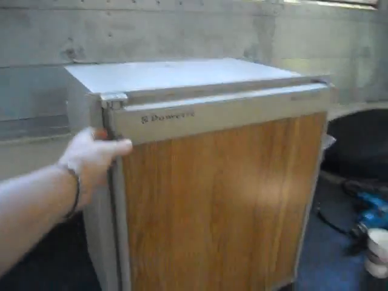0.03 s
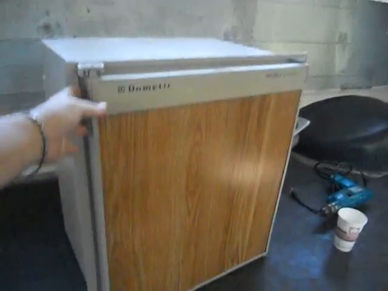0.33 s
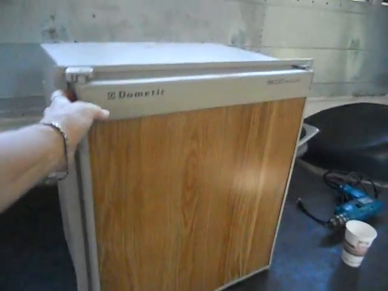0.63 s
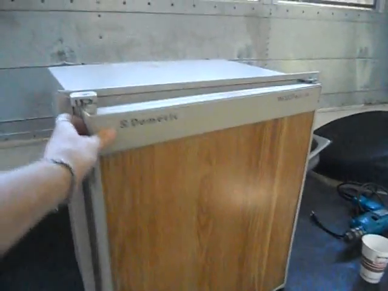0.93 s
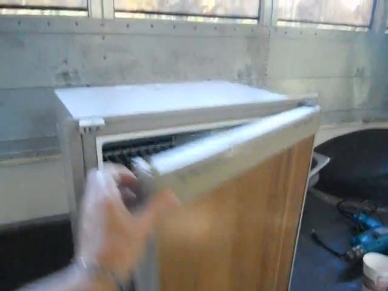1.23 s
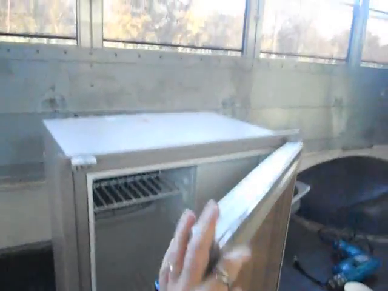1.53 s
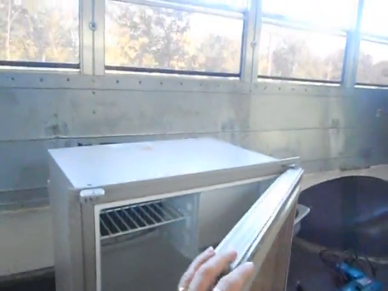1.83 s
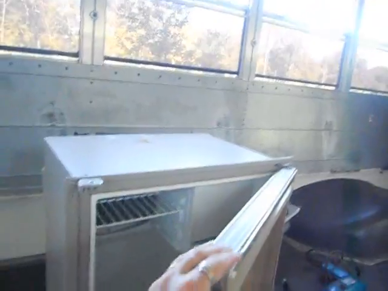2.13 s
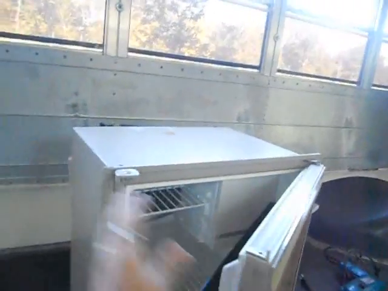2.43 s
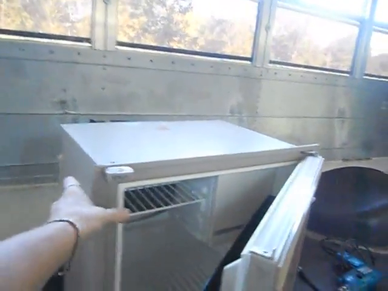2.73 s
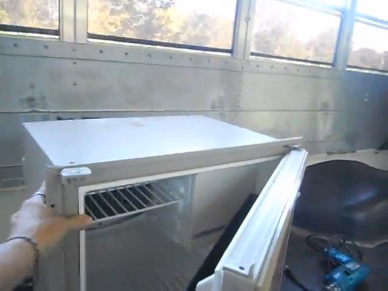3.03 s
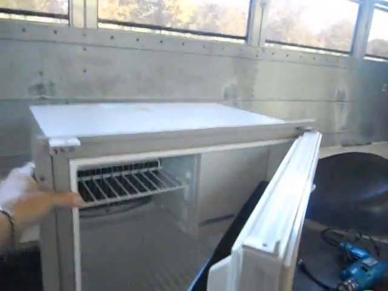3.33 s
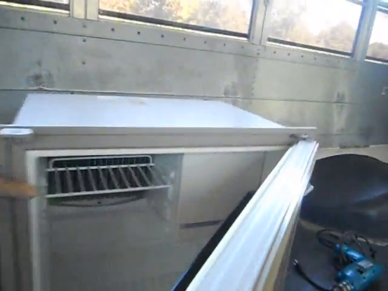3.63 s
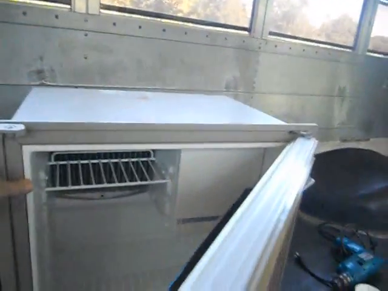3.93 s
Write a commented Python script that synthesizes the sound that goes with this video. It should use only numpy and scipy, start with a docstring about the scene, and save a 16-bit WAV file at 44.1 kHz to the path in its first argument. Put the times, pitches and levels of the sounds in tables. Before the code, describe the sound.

A bus engine idles throughout, heard inside the cabin as a deep drone with pulsing rumble, faint whines and hiss. Around 1 second a small fridge unlatches nearby with sharp clicks and knocks, and the engine level dips slightly. The door clicks and bumps at 1.6 seconds. A soft thump comes at 3.2 and a bright click at 3.5. Near 3.9 a loud, close clack ducks everything.

```python
"""Inside a bus, its six-cylinder engine idling: a deep firing drone, a pulsing rumble, faint whines, hiss.
From 0.6 s to 2 s the microphone moves to a second spot in the cabin's standing waves, and the tones
change balance. Around 1 s a hand unlatches a small fridge, then swings its door open with clicks, knocks
and soft bumps. Near 3.9 s a last loud clack close by makes the recorder's gain control duck everything."""
import sys
import numpy as np
from scipy import signal
from scipy.fft import rfft, irfft, next_fast_len
from scipy.io import wavfile
from scipy.ndimage import uniform_filter1d, map_coordinates

SR = 44100
rng = np.random.default_rng(int(sys.argv[2]) if len(sys.argv) > 2 else 0)


def transcribe(signal):
    """Save signal, clipped to [-1, 1], as a 16-bit WAV file at the path in sys.argv[1]."""
    frames = np.atleast_2d(signal).T
    limited = np.clip(frames, -1, 1)
    pcm = np.round(limited * 32767).astype(np.int16)
    wavfile.write(sys.argv[1], SR, pcm)


N = 176400

FIRING_HZ, CYLINDERS = 38.06, 6
TOP_HZ = 10020  # the recorder's band limit
# level of the background as heard, ducked by the recorder's gain control near 1.07 s and slowly
# recovering: t/s, boom level/dB, clatter level/dB, hiss level/dB
BACKGROUND_LEVELS = [(0, -24.5, -29.5, -37.5), (.7, -25, -28.5, -37.5), (1.05, -25, -29, -37.5),
                     (1.1, -28, -31, -39.5), (1.7, -27.6, -31, -39), (2.3, -26.5, -29.5, -38),
                     (2.8, -24, -28, -37), (3.3, -24, -28, -36), (3.85, -24, -26.5, -36)]


def clicks():
    """Hard contacts of latch and door crack and ring the steel fittings, the bright glancing ones least."""
    # contacts: t/s, level/dB, t60/s, tilt/dB per octave
    contacts = [(.811, -21, 0.011, -.7), (.950, -32, 0.05, 1), (1.027, -10.5, 0.009, 0.8),
                (1.056, -20.5, 0.0099, -3.5), (1.570, -18.5, 0.02, -2.5), (1.580, -25.5, .022, -2),
                (1.604, -23.5, 0.026, -1), (3.503, -19, 0.041, 5.5), (3.520, -31.5, 0.24, 4),
                (3.865, -18.5, 0.049, -2.5), (3.872, -13.5, 0.068, -2.5), (3.885, -2.5, 0.029, -3),
                (3.901, -11.5, .02, -.7)]
    # spectrum of a crack: f/Hz, level/dB
    crack_colour = [(300, -5), (1000, 6), (1600, -8), (2500, 2.5), (3500, -3), (4500, 0), (6000, 0),
                    (9500, -4)]
    # modes of the fittings: f/Hz, level/dB, t60/s
    steel_modes = [(2360, -9, .05), (2600, -7.5, .05), (3460, -10, .06), (5160, -19, .05)]
    out, t = np.zeros(N), np.arange(SR // 4) / SR
    attack = 1 - np.exp(-t / 0.00019)
    for s, db, t60, tilt_db in contacts:
        crack = amp(-60 * t / t60) * coloured(rng.standard_normal(len(t)), crack_colour, tilt_db)
        glance_db = 3 * max(tilt_db, 0)
        ring = sum(amp(level - glance_db - 60 * t / ring_s) * t60 / ring_s * np.sin(2 * np.pi * hz * t)
                   for hz, level, ring_s in steel_modes)
        add(out, s, amp(db) * (crack + ring) * attack)
    return out


def knocks():
    """Each knock rings the fridge cabinet's panels over a dull thud."""
    # blows on the cabinet: t/s, level/dB, tilt/dB per octave
    blows = [(.953, -24.5, 4.5), (1.026, -20.5, -1), (1.056, -15, 1), (1.068, -16.5, 1), (1.612, -14, 2.5),
             (1.633, -19, -1), (3.505, -20.5, -1), (3.877, -8, 1), (3.886, 1.6, -1)]
    # modes of the panels: f/Hz, level/dB, t60/s
    panel_modes = [(181.6, 0, 0.14), (303, -12, 0.069), (559, -14.5, 0.097), (717, -11.5, 0.085),
                   (869, -7, 0.064), (1029, -7, 0.045), (1174, -9, .03)]
    # spectrum of the thud: f/Hz, level/dB
    thud_colour = [(70, -16), (170, -3), (400, 3.5), (1300, -8.5), (1900, -13.5), (4000, -18), (9000, -46)]
    thud_db, thud_t60_s, pivot_hz = -3.5, 0.034, 400
    out, t = np.zeros(N), np.arange(SR // 3) / SR
    attack = 1 - np.exp(-t / .001)
    for s, db, tilt_db in blows:
        ring = np.zeros(len(t))
        for hz, level, t60 in panel_modes:
            mode_db = level + tilt_db * np.log2(hz / pivot_hz) + rng.normal(0, 1)
            mode_hz = hz * (1 + rng.normal(0, 0.015))
            ring += amp(mode_db - 60 * t / t60) * np.sin(2 * np.pi * mode_hz * t)
        noise = coloured(rng.standard_normal(len(t)), thud_colour, tilt_db)
        thud = amp(thud_db - 60 * t / thud_t60_s) * noise
        add(out, s, amp(db) * (ring + thud) * attack)
    return out


def bumps():
    """The hand pushes softly on door and cabinet: a low thump whose pitch sags as the push relaxes."""
    # pushes: t/s, level/dB
    pushes = [(1.050, -20), (1.604, -13), (3.234, -14.5)]
    start_hz, end_hz, sag_s = 239, 146, 0.014
    rise_s, t60 = 0.0053, 0.35
    out, t = np.zeros(N), np.arange(SR // 3) / SR
    hz = end_hz + (start_hz - end_hz) * np.exp(-t / sag_s)
    thump = sine(hz) * amp(-60 * t / t60) * (1 - np.exp(-t / rise_s))
    for s, db in pushes:
        add(out, s, amp(db) * thump)
    return out


def cabin_echo(x, t60=0.17):
    """The short echo of the bare bus interior, reaching the microphone 4 ms after the direct sound."""
    t = np.arange(SR // 2) / SR
    tail = rng.standard_normal(len(t)) * amp(-60 * t / t60) * (t > .004)
    return signal.fftconvolve(x, tail / np.linalg.norm(tail))[:N]


def drone():
    """The firing rate and its multiples boom in the cabin; the overtones waver more."""
    # harmonics: multiple of the firing rate, level/dB at the first spot, level/dB at the second
    harmonics = [(1, -17.5, -18), (2, -35, -34), (3, -35, -36), (4, -31.5, -40), (5, -34.5, -33.5),
                 (7, -41.5, -44.5), (8, -36.5, -41.5), (14, -45.5, -42)]
    # rise and fall of the whole drone: t/s, level/dB
    drone_gain = [(0, -0.5), (.8, 2.1), (1.04, 0), (1.1, -1), (1.7, -1.5), (2.4, 2), (3.25, 1.7), (3.85, 2)]
    phase, tones = 2 * np.pi * firings(), np.zeros(N)
    for k, first_db, second_db in harmonics:
        db = microphone_move(first_db, second_db) + 0.3062 * min(k, 6) * wobble(6.02)
        offset = (k > 2) * rng.uniform(0, 2 * np.pi)
        tones += amp(db) * np.cos(k * phase + offset)
    return np.sqrt(2) * amp(curves(drone_gain)[0]) * tones


def rumble():
    """The engine shakes the bus body and clatters through the floor."""
    # spectrum of the body's boom: f/Hz, level/dB
    boom_colour = [(12, -4), (30, -7), (55, 4.5), (80, -5), (100, 2), (125, -1), (165, 4), (225, -0.5),
                   (320, -1), (425, -1), (500, -9), (800, -31.5), (2000, -76)]
    # spectrum of the clatter above the floor: f/Hz, level/dB
    clatter_colour = [(200, -19.5), (480, -3.5), (590, -1.5), (670, 1), (850, -.5), (1000, 0.7),
                      (1120, -0.5), (1230, -1), (1400, -1.5), (1530, -9), (1950, -11), (2500, -13.5),
                      (3200, -23), (9000, -35.5)]
    boom_db, clatter_db, _ = curves(BACKGROUND_LEVELS)
    boom = coloured(combustion(repeat_share=.62), boom_colour)
    clatter = coloured(combustion(repeat_share=0.51), clatter_colour)
    return amp(boom_db) * boom + amp(clatter_db) * clatter


def combustion(repeat_share):
    """Engine noise: part repeats with each cycle of six firings, part is new; it swells at every firing."""
    count = firings()
    cycle = rng.standard_normal(round(SR * CYLINDERS / FIRING_HZ))
    cycle = unit(irfft(np.exp(1j * np.angle(rfft(cycle)))))  # flat spectrum, random phases
    repeated = map_coordinates(cycle, [count / CYLINDERS % 1 * len(cycle)], mode="grid-wrap")
    noise = np.sqrt(repeat_share) * repeated + np.sqrt(1 - repeat_share) * rng.standard_normal(N)
    return noise * firing_swell(count, depth=0.095)


def whines():
    """Faint high overtones of the engine whine; the higher ones drift more in frequency."""
    # tones: f/Hz, level/dB at the first spot, level/dB at the second
    tones = [(646.4, -46, -48), (670.5, -54, -44), (758.5, -59, -42), (800.4, -38, -44),
             (951, -47.5, -46.5), (1034, -45, -54), (1076, -59, -43.5), (1117, -50.5, -43.5),
             (1384, -59.5, -45.5)]
    waver_db, drift_hz, lowest_hz = 3.5, 1.263, tones[0][0]
    out = np.zeros(N)
    for hz, first_db, second_db in tones:
        db = microphone_move(first_db, second_db) + waver_db * wobble(4.06)
        out += amp(db) * sine(hz + drift_hz * hz / lowest_hz * wobble(14))
    return np.sqrt(2) * out


def hiss():
    """Smooth, nearly white hiss that swells slightly at each firing."""
    # spectrum of the hiss: f/Hz, level/dB
    hiss_colour = [(300, -4), (3000, 0.5), (4500, 0.5), (5800, 0.3), (7000, 0.2), (9000, -0.7),
                   (10000, -2.5)]
    swell = firing_swell(firings(), depth=0.077)
    return amp(curves(BACKGROUND_LEVELS)[2]) * swell * coloured(rng.standard_normal(N), hiss_colour)


def firings(first_s=0.00197):
    """Running count of the engine's slightly uneven firings at each sample."""
    return FIRING_HZ * (np.arange(N) / SR - first_s) + 0.0082 * wobble(8)


def firing_swell(count, depth, lag_s=0.0067):
    """A gain that peaks just after each firing."""
    return 1 + depth * np.cos(2 * np.pi * (count - lag_s * FIRING_HZ))


def microphone_move(first_db, second_db, start_s=0.63, end_s=2.05):
    """A tone's level glides as the microphone moves between two spots in the cabin's standing waves."""
    return np.interp(np.arange(N) / SR, [start_s, end_s], [first_db, second_db])


def amp(db):
    """Decibels to gain."""
    return 10 ** (np.asarray(db) / 20)


def unit(x):
    """Scaled to rms 1."""
    return x / np.sqrt(np.mean(x ** 2) + 1e-20)


def sine(hz):
    """A tone that follows one frequency per sample."""
    return np.sin(2 * np.pi * np.cumsum(hz) / SR)


def curves(rows):
    """One value per sample for each column after the time."""
    s, *columns = np.transpose(rows)
    return [np.interp(np.arange(N) / SR, s, column) for column in columns]


def wobble(rate):
    """A smooth random curve, rate knots a second."""
    return map_coordinates(rng.standard_normal(int(N * rate / SR) + 4), [np.arange(N) * rate / SR])


def coloured(x, points, tilt_db=0):
    """x through a spectrum (f/Hz, level/dB) and a tilt per octave, band-limited, at rms 1."""
    hz = np.fft.rfftfreq(len(x), 1 / SR) + 1
    f, db = np.transpose(points)
    octaves = np.log2(np.clip(hz, f[0], f[-1]))
    gain = amp(np.interp(np.log(hz), np.log(f), db) + tilt_db * octaves)
    return unit(irfft(rfft(x) * gain * (hz < TOP_HZ + 500), len(x)))


def add(track, s, sound):
    """Mix a sound in at time s."""
    part = track[round(s * SR):][:len(sound)]
    part += sound[:len(part)]


def scene():
    """One microphone in the cabin: the fridge door and its echo over the idling bus."""
    bus = drone() + rumble() + whines() + hiss()
    door = clicks() + knocks() + bumps()
    return (bus + door + amp(-4.5) * cabin_echo(door))[None]


def record(dry):
    """Gain control ducks at once on loud sound and recovers slowly; soft clipping and a band limit follow."""
    limit_db, window_s, release_db_per_s = -10.5, 0.0056, 19
    sense_above_hz, clip_db = 100, -6
    size = int(window_s * SR)
    sensed = signal.sosfilt(signal.butter(2, sense_above_hz, "highpass", fs=SR, output="sos"), dry[0])
    power = np.abs(uniform_filter1d(sensed ** 2, size, origin=size // 4))
    excess_db = np.maximum(10 * np.log10(power + 1e-12) - limit_db, 0)
    recovery_db = release_db_per_s * np.arange(N) / SR
    ducked = dry * amp(recovery_db - np.maximum.accumulate(excess_db + recovery_db))
    rounded = ducked / (1 + np.abs(ducked / amp(clip_db)) ** 10) ** (1 / 10)
    padded = next_fast_len(N + SR // 2)
    lowpass = np.clip((TOP_HZ + 100 - np.fft.rfftfreq(padded, 1 / SR)) / 200, 0, 1) ** 2
    return irfft(rfft(rounded, padded) * lowpass, padded)[:, :N]


dry = scene()
out = record(dry)
transcribe(out)
```